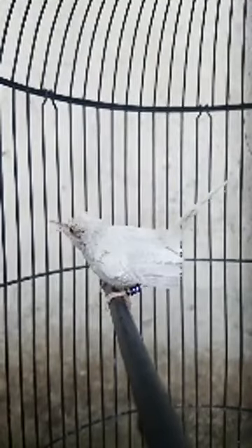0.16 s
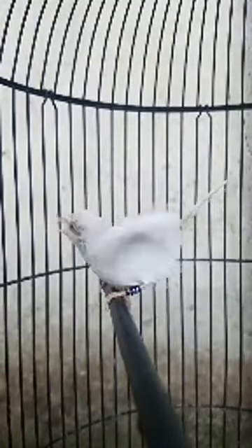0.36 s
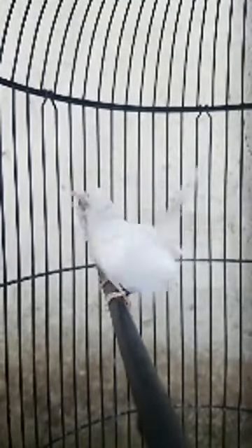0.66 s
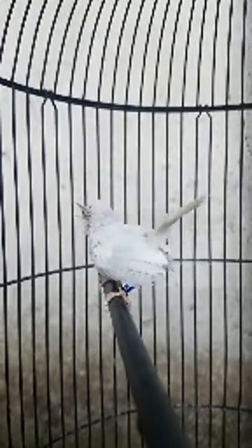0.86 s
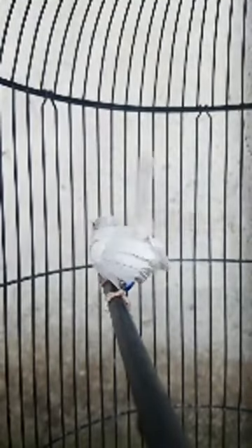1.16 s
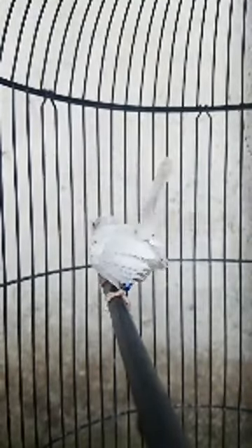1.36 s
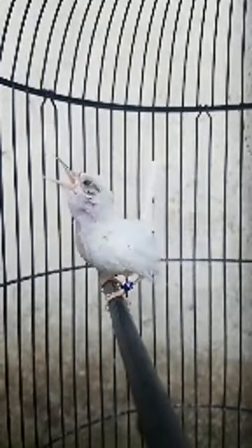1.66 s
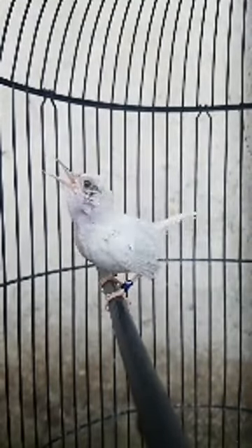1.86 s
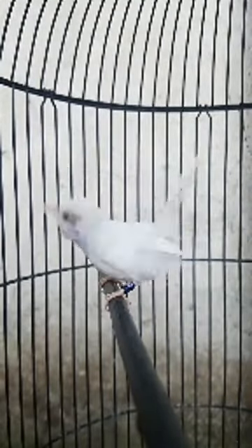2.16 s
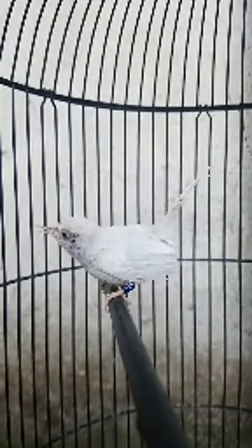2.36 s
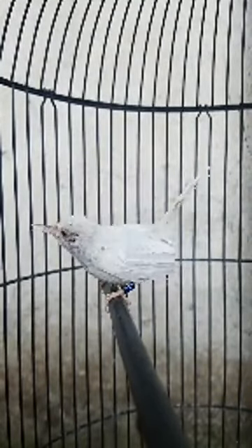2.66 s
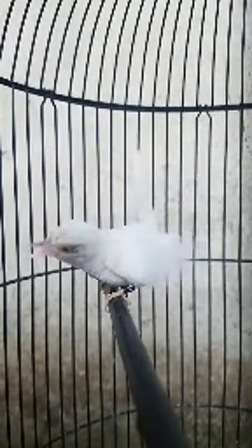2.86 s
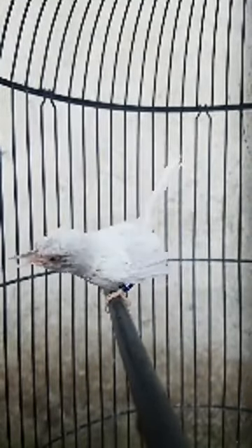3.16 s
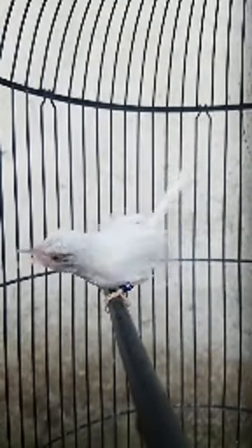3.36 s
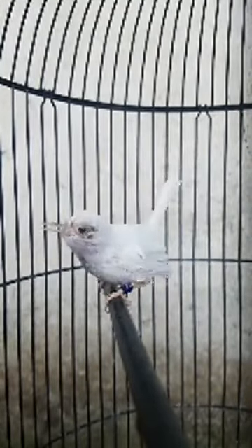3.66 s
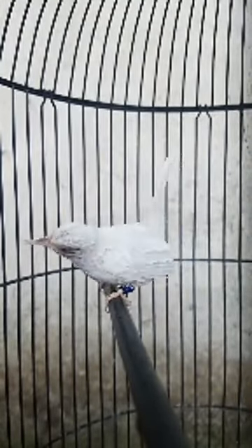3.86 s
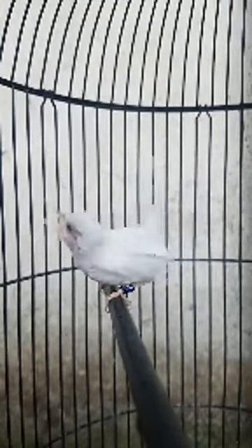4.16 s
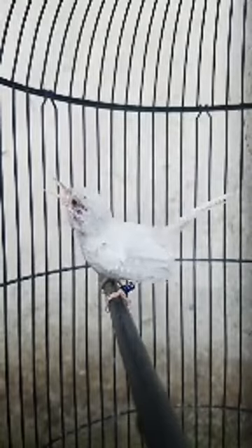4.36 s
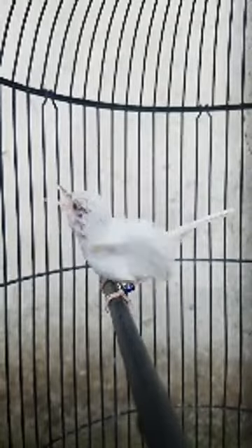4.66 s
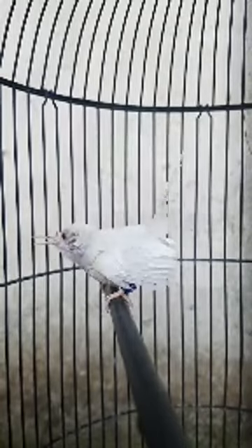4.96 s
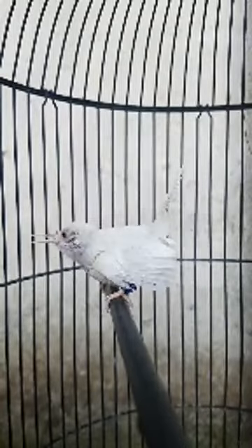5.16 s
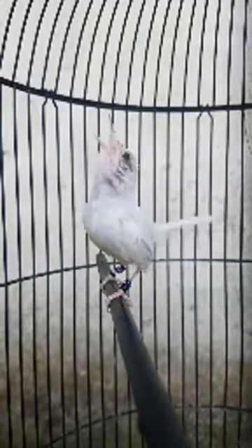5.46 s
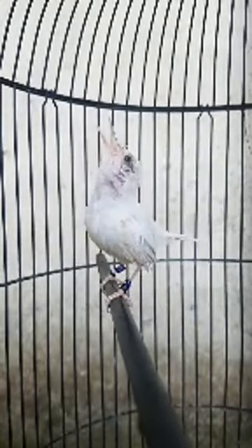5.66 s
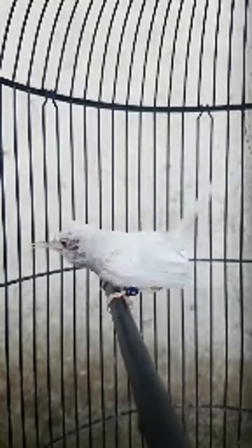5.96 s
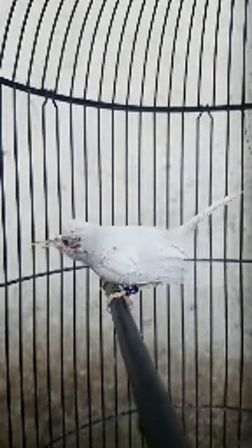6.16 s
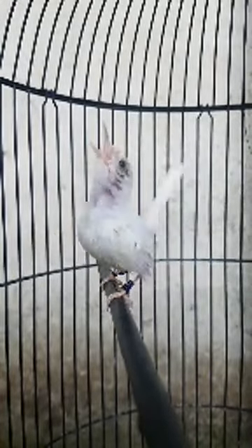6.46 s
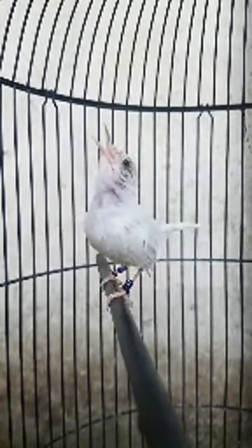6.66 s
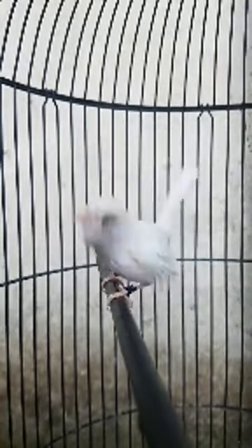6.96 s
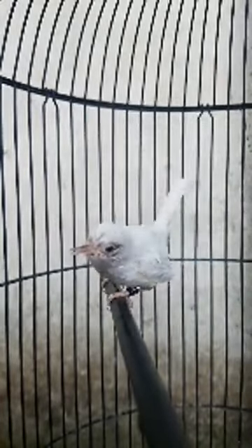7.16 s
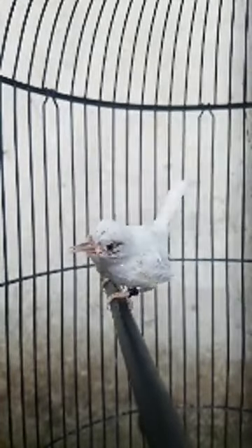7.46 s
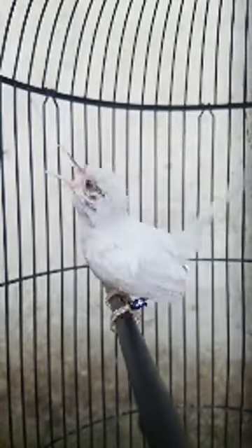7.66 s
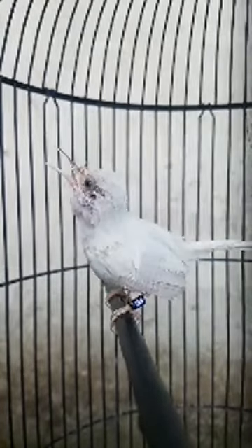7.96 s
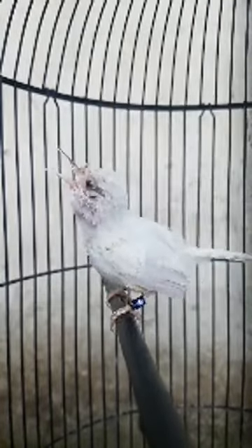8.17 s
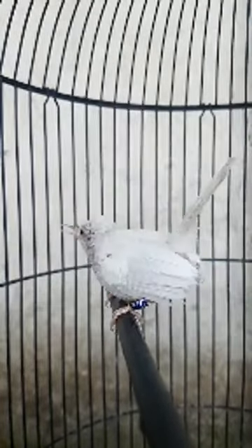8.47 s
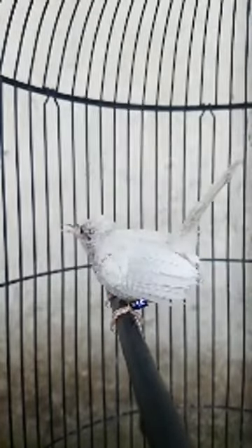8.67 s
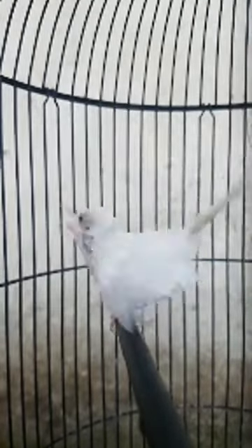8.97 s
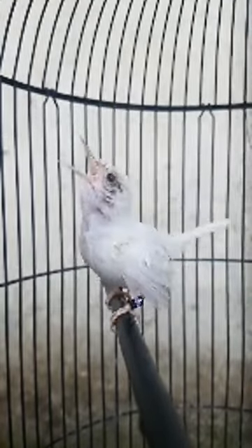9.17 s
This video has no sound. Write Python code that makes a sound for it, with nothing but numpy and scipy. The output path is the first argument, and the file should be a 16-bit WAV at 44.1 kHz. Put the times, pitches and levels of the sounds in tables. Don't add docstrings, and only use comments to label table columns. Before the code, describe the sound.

A small songbird close to the microphone and another across the room alternate loud, pure whistled phrases. Each starts with a tiny flick, drops into a steady high whistle, then ends in a fast swooping chirp. Dry bill rattles fall between songs. A low engine idles outside under faint street wash, with a brief tyre hiss early and a firm perch knock near the end.

```python
import sys
import numpy as np
from scipy import signal
from scipy.fft import rfft, irfft, next_fast_len
from scipy.io import wavfile
from scipy.ndimage import uniform_filter1d, minimum_filter1d, map_coordinates

SR = 44100
rng = np.random.default_rng(int(sys.argv[2]) if len(sys.argv) > 2 else 0)


def volts_from_decibels(level):
    exponent = np.asarray(level, float) / 20
    return 10 ** exponent


def generate_wav(sig):
    pcm = np.round(np.clip(np.atleast_2d(sig).T, -1, 1) * 32767).astype(np.int16)
    wavfile.write(sys.argv[1], SR, pcm)


N = 411012


def along(points, hz):
    f, v = np.transpose(points)
    return np.interp(np.log(hz + 1), np.log(f + 1), v)


def curve(rows):
    s, v = np.transpose(rows)
    return np.interp(np.arange(N) / SR, s, v)


def wobble(rate, size=N):
    knots = rng.standard_normal(int(size * rate / SR) + 4)
    coarse = np.arange(0, size + 16, 16)
    return np.interp(np.arange(size), coarse, map_coordinates(knots, [coarse * rate / SR]))


def filtered(x, response):
    m = next_fast_len(len(x) + 8192)
    return irfft(rfft(x, m) * response(np.fft.rfftfreq(m, 1 / SR)), m)[:len(x)]


def noise(spectrum):
    x = filtered(rng.standard_normal(N), lambda hz: volts_from_decibels(along(spectrum, hz)))
    return x / np.std(x)


def add(track, s, sound):
    part = track[round(s * SR):][:len(sound)]
    part += sound[:len(part)]


# f/Hz, decay by 60 dB t/s
ROOM_DECAY = [(500, 0.74), (3000, 0.32), (5000, 0.31), (10000, 0.022)]


def room(walls_db, tail_db):
    hz, t, z = signal.stft(rng.standard_normal(SR // 2), SR, nperseg=256)
    decay = volts_from_decibels(-60 * t / along(ROOM_DECAY, hz)[:, None])
    tail = signal.istft(z * decay, SR, nperseg=256)[1]
    response = volts_from_decibels(tail_db) * np.pad(tail, (300, 0)) / np.linalg.norm(tail)
    walls = rng.uniform(size=(6, 2))
    delays_s = .002 + .022 * walls[:, 0]
    response[(SR * delays_s).astype(int)] += volts_from_decibels(walls_db - 12.0 * walls[:, 1])
    response[0] = 1
    return response


WAVER_HZ, RIPPLE_HZ, WAVER_DB = 5, 7, .7


def note(rows, partials, rough_db, response):
    s, hz, db = np.transpose(rows)
    t = np.arange(s[0] - .002, s[-1] + 0.0052, 1 / SR)
    n = len(t)
    pitch = uniform_filter1d(np.interp(t, s, hz), size=151)
    pitch = pitch + WAVER_HZ * wobble(40, size=n) + RIPPLE_HZ * wobble(180, size=n)
    phase = 2 * np.pi * np.cumsum(pitch) / SR
    edge = np.clip(np.minimum((t - t[0]) / .004, (t[-1] - t) / .007), 0, 1)
    ends = np.sin(np.pi / 2 * edge) ** 2

    sweep = np.minimum(abs(np.gradient(pitch)) * SR / 40000, 1)
    breath = uniform_filter1d(uniform_filter1d(rng.standard_normal(SR), size=13), size=11)[:n] * 6
    air = volts_from_decibels(rough_db) * sweep * (t < t[0] + .1) * breath

    tone = np.zeros(n)
    for k, level in partials:
        flutter_db = .6 * wobble(70, size=n) if k == 1 else 4 * wobble(20, size=n)
        tone += volts_from_decibels(level + flutter_db) * np.sin(k * phase)
    level = uniform_filter1d(volts_from_decibels(np.interp(t, s, db)), size=89)
    sound = level * ends * tone * (1 + air) * volts_from_decibels(WAVER_DB * wobble(30, size=n))
    sound *= volts_from_decibels(3.3 * sweep * wobble(220, size=n))

    settled = np.clip((t - t[0] - .06) / .05, 0, 1)
    tail = (0, len(response) - 1)
    held = np.pad(settled * sound, tail)
    echoes = signal.fftconvolve(settled * sound, response) - held
    hidden = np.pad(.85 * settled * ends, tail)
    moving = signal.fftconvolve((1 - settled) * sound, response)
    return t[0], moving + held + (1 - hidden) * echoes


def sing(notes, walls_db, tail_db, rough_db):
    out = np.zeros(N)
    for rows, partials in notes:
        add(out, *note(rows, partials, rough_db, room(walls_db, tail_db)))
    return out


def placed(shape, s, db):
    return np.add(shape, [s, 0, db])


NEAR_SETTLE_S, SHARP_HZ, EASE_S = .08, 152, 0.088
PUSH_S, PUSH_RISE_S, PUSH_HZ = .045, 0.038, 51.6


def near_hold(s, end, rest_hz, first_db, last_db, push_db):
    push_at = end - PUSH_S
    t = np.append(np.linspace(s, push_at, num=12), [push_at + PUSH_RISE_S, end])
    push = np.clip((t - end + PUSH_S) / PUSH_RISE_S, 0, 1)
    hz = rest_hz + SHARP_HZ * np.exp((s - t) / EASE_S) + PUSH_HZ * push
    drift_db = np.interp(t, [s, push_at], [first_db, last_db])
    return np.c_[t, hz, drift_db + (push_db - last_db) * push]


# t/s after the note starts, f/Hz, level/dB
NEAR_FLICK = [(-0.004, 3182, -12), (0.0, 3391, 1), (0.005, 3543, -1.5), (0.01, 3655, 5),
              (0.015, 3555, -19.5)]
NEAR_GLIDE = [(0.0, 5050, -13), (0.005, 4620, -1.5), (0.011, 4258, 6.5), (0.02, 3919, 0.5),
              (0.035, 3776, 0.5), (0.055, 3660, -1.5)]
NEAR_SLUR = [(-0.001, 3260, 0), (0.004, 3068, 5), (0.01, 2753, 3), (0.016, 2500, -4), (0.022, 2444, -1),
             (0.027, 2385, -28.5)]
NEAR_ARCH = [(0.0, 1564, -23.5), (0.005, 1972, -16), (0.012, 2752, -1.5), (0.018, 3281, 0),
             (0.024, 3468, 4), (0.03, 3299, 2.5), (0.036, 2901, -9), (0.042, 2392, -10),
             (0.049, 1570, -25.5)]
# flick t/s, flick level/dB, glide level/dB
NEAR_OPENINGS = [(0.685, -7.5, -13.5), (1.769, -5.5, -15), (3.035, -6, -16.5), (4.322, -7.5, -14.0),
                 (5.503, -12.5, -17), (6.571, -6, -16.5), (7.843, -7, -15.5), (9.227, -9.5, -13.5)]
# end t/s, resting f/Hz, settled level/dB, level/dB before the push, push level/dB
NEAR_WHISTLES = [(1.087, 3412, -15, -16.5, -9), (2.161, 3407, -15, -15, -9.5),
                 (3.4, 3426, -12.5, -12.5, -5.5), (4.695, 3407, -17.5, -11, -8),
                 (5.907, 3394, -19.5, -13.5, -10.5), (6.952, 3396, -18, -13.5, -9.5),
                 (8.222, 3398, -14.5, -13.5, -7), (9.6, 3386, -20.5, -14, -12)]
# slur t/s, slur level/dB, arch level/dB
NEAR_FLOURISHES = [(1.146, -13.5, -10), (2.22, -14.5, -9.5), (3.456, -11.5, -7), (4.761, -14.5, -9),
                   (5.967, -12.5, -8.5), (7.008, -13.5, -6.5), (8.281, -13, -9.5)]
# multiple of pitch, level/dB
NEAR_PARTIALS = [(.5, -49), (1, 0), (1.5, -65), (2, -63.5), (3, -72.5)]
# multiple of pitch, level/dB
FLICK_PARTIALS = [(.5, -46), (1, 0), (1.4, -40), (2, -50)]
SLUR_PARTIALS = [(1, 0), (1.28, -21), (2, -49)]
ARCH_PARTIALS = [(1, 0.5), (1.5, -44.5), (2, -53)]
NEAR_GLIDE_AFTER_S, ARCH_AFTER_S = .0245, .0405


def near_bird():
    notes = []
    for (s, flick_db, glide_db), hold in zip(NEAR_OPENINGS, NEAR_WHISTLES):
        glide = s + NEAR_GLIDE_AFTER_S
        held = near_hold(glide + NEAR_SETTLE_S, *hold)
        whistle = np.vstack([placed(NEAR_GLIDE, glide, glide_db), held])
        notes.append((placed(NEAR_FLICK, s, flick_db), FLICK_PARTIALS))
        notes.append((whistle, NEAR_PARTIALS))
    for s, slur_db, arch_db in NEAR_FLOURISHES:
        notes.append((placed(NEAR_SLUR, s, slur_db), SLUR_PARTIALS))
        notes.append((placed(NEAR_ARCH, s + ARCH_AFTER_S, arch_db), ARCH_PARTIALS))
    return sing(notes, walls_db=-19, tail_db=-23, rough_db=-33.0)


FAR_SETTLE_S, SAG_HZ_PER_S, DROOP_HZ, DROOP_S, SWELL_STEEP = .07, 420, 25.2, 0.043, 2.5


def far_hold(s, end, last_hz, first_db, last_db, half_s):
    t = np.linspace(s, end, num=14)
    swell = 1 - 1 / (1 + ((t - s) / half_s) ** SWELL_STEEP)
    hz = last_hz + SAG_HZ_PER_S * (end - t) + DROOP_HZ * (1 - np.exp((t - end) / DROOP_S))
    return np.c_[t, hz, first_db + (last_db - first_db) * swell / swell[-1]]


# t/s after the note starts, f/Hz, level/dB
FAR_FLICK = [(-0.002, 3420, 5.5), (0.002, 3640, 0), (0.006, 3600, 6.5), (0.011, 4100, -1.5),
             (0.015, 3910, -12.5)]
FAR_GLIDE = [(0.0, 5070, -6), (0.005, 4540, 2), (0.011, 4280, 0.5), (0.018, 3960, 2.5), (0.03, 3600, -3.5),
             (0.045, 3430, 0.5)]
FAR_SWOOP = [(-0.002, 3140, -22.5), (0.003, 2972, 6), (0.011, 2413, -3.5), (0.022, 1596, -18.5),
             (0.032, 2348, -5), (0.042, 3169, 4), (0.053, 3290, 4), (0.064, 3006, 1.5),
             (0.082, 2244, -16.5)]
# flick t/s, flick level/dB, glide level/dB
FAR_OPENINGS = [(.027, -21, -14.5), (1.895, -18, -17.5), (3.511, -21.5, -17), (5.069, -20, -15.5),
                (6.929, -16, -16), (8.549, -19, -15)]
# end t/s, last f/Hz, first level/dB, last level/dB, time to half the swell t/s
FAR_WHISTLES = [(0.333, 3251, -18, -6.5, 0.049), (2.194, 3275, -12.5, -7, .1),
                (3.819, 3233, -18, -6.5, 0.026), (5.369, 3258, -12.5, -5, 0.039),
                (7.235, 3256, -16.5, -7.5, 0.47), (8.856, 3242, -13.5, -6.5, 0.031)]
# t/s after, change of f/Hz, change of level/dB
FAR_HOOK = [(.003, -70, -1), (.007, -260, -9)]
# swoop t/s, level/dB
FAR_SWOOPS = [(0.41, -8), (2.268, -8), (3.895, -8), (5.447, -8.5), (7.311, -7), (8.931, -7.5)]
# multiple of pitch, level/dB
FAR_PARTIALS = [(.5, -58), (1, 0), (1.5, -52), (2, -54.5), (3, -72.5)]
SWOOP_PARTIALS = [(1, 0), (1.5, -46), (2, -48), (3, -67)]
FAR_GLIDE_AFTER_S = .0275


def far_bird():
    notes = []
    for (s, flick_db, glide_db), row, swoop in zip(FAR_OPENINGS, FAR_WHISTLES, FAR_SWOOPS):
        glide = s + FAR_GLIDE_AFTER_S
        hold = far_hold(glide + FAR_SETTLE_S, *row)
        whistle = np.vstack([placed(FAR_GLIDE, glide, glide_db), hold, np.add(FAR_HOOK, hold[-1])])
        notes.append((placed(FAR_FLICK, s, flick_db), FLICK_PARTIALS))
        notes.append((whistle, FAR_PARTIALS))
        notes.append((placed(FAR_SWOOP, *swoop), SWOOP_PARTIALS))
    return sing(notes, walls_db=-16, tail_db=-21.0, rough_db=-32.5)


# first snap t/s, last snap t/s, loudest level/dB, place of the loudest snap
RATTLES = [(0.5652, 0.5938, -29, 1.3), (1.715, 1.7674, -27, 1.3), (3.3076, 3.36, -27, 1),
           (4.1935, 4.2393, -27, 1.4), (4.868, 4.9223, -26, 0.97), (6.7337, 6.792, -26, 2),
           (7.7248, 7.7573, -27, .4), (8.3796, 8.408, -27, 0.16), (9.087, 9.153, -26.5, 1.6)]
SNAP_COUNTS = [3, 5, 5, 4, 5, 5, 3, 3, 5]
# f/Hz, level/dB
BILL = [(500, -36), (900, -5.5), (1600, 0.5), (3000, 0), (4300, 7.5), (6000, -3.5), (7200, -15),
        (8200, -23), (11000, -14), (16000, -16)]
SNAP_RISE_DB, SNAP_FADE_DB, SNAP_SCATTER_DB, SNAP_SPACING_POWER = 4, 3.5, 1.6, 0.94


def bills():
    out, t = np.zeros(N), np.arange(300) / SR
    for (first, last, top_db, place), count in zip(RATTLES, SNAP_COUNTS):
        k = np.arange(count)
        response = room(walls_db=-12, tail_db=-14)[:SR // 3]
        times = first + (last - first) * (k / (count - 1)) ** SNAP_SPACING_POWER
        levels = top_db - np.maximum(SNAP_RISE_DB * (place - k), SNAP_FADE_DB * (k - place))
        for s, db in zip(times, levels):
            crack = volts_from_decibels(-60 * t / 0.014) * rng.standard_normal(len(t))
            scatter_db = SNAP_SCATTER_DB * rng.standard_normal()
            crack *= volts_from_decibels(db + 20.0 + scatter_db) / np.linalg.norm(crack)
            add(out, s, signal.fftconvolve(crack, response))
    return filtered(out, lambda hz: volts_from_decibels(along(BILL, hz)))


# t/s, peak level/dB
KNOCKS = [
    (2.855, -59),
    (6.481, -39),
    (9.2, -21.5),
    (9.206, -34),
]
# f/Hz, width f/Hz, level/dB
PERCH_MODES = [(480, 130, -4.5), (930, 32, 5), (1170, 71, -2), (2300, 1200, -6.5)]


def perch():
    blows = np.zeros(N)
    for s, db in KNOCKS:
        add(blows, s, volts_from_decibels(db + 13.5) * np.hanning(14))

    def wood(f):
        total = 0
        for k, (centre, width, db) in enumerate(PERCH_MODES):
            damping = 1j * f * width
            total = total + (-1) ** k * volts_from_decibels(db) * damping / (centre * centre - f * f + damping)
        return total

    return signal.fftconvolve(filtered(blows, wood), room(walls_db=-3.5, tail_db=-13.5))[:N]


# start t/s, end t/s, cycle f/Hz
LOADS = [(0.197, .45, 14.3), (1.162, 1.629, 14.15), (2.723, 3.499, 14.05), (3.753, 4.121, 14.2),
         (4.214, 5.245, 14.2), (5.448, 5.943, 14.2), (6.701, 7.9, 14.47)]
# multiple of the firing cycle, level/dB
ORDERS = [(1, -33), (2, -27), (3, -17.5), (4, 0), (5, -5.5), (6, -3), (7, -4), (8, -3), (9, 2), (10, -11),
          (11, -20), (12, -20), (13, -5), (14, -9.5), (15, -15.5), (16, -18), (17, -13.5), (18, -7),
          (19, -14), (20, -26.5)]
LOAD_DB_PER_HZ = {9: 7, 13: 22.5, 14: -10}
# f/Hz, level/dB
WHINE = [(972, -69.5)]
# t/s, level/dB
WHINE_FADES = [(0, -0.5), (4.6, 1), (5.2, -4.5), (9.32, -4.5)]
# f/Hz, level/dB per Hz
RUMBLE = [(15, -58.5), (25, -28.5), (43, -8.5), (119, -6.5), (257, -15.5), (408, -23.5), (501, -25),
          (659, -28.5), (961, -32.5), (1500, -41), (1950, -65), (3300, -120)]
IDLE_HZ, IDLE_DB, SAG_S = 14.55, -44, .06
RUMBLE_SWAY_DB = .8


def engine():
    t = np.arange(N) / SR
    sag = np.zeros(N)
    for start, end, hz in LOADS:
        sag += (IDLE_HZ - hz) * np.clip(np.minimum(t - start, end - t) / SAG_S + .5, 0, 1)
    cycle_hz = (IDLE_HZ - sag) * (1 + .002 * wobble(3.2))
    phase = 2 * np.pi * np.cumsum(cycle_hz) / SR
    orders = np.zeros(N)
    for k, db in ORDERS:
        load_db = LOAD_DB_PER_HZ.get(k, 0) * (sag - .2)
        level = volts_from_decibels(db + load_db + 1.5 * wobble(3))
        orders += level * np.sin(k * phase + rng.uniform(0, 2 * np.pi))
    throb = volts_from_decibels(IDLE_DB) * orders / np.std(orders)

    whine = np.zeros(N)
    for hz, db in WHINE:
        level = volts_from_decibels(db + curve(WHINE_FADES) + 4 * wobble(3))
        whine += level * np.sin(2 * np.pi * np.cumsum(hz + 4 * wobble(3)) / SR)
    rumble = volts_from_decibels(-48.0 + RUMBLE_SWAY_DB * wobble(2.8)) * noise(RUMBLE)
    return throb + whine + rumble


# t/s, length t/s, start f/Hz, end f/Hz, level/dB
COOS = [(0.899, 0.39, 818, 804, -65), (2.096, 0.15, 795, 762, -63.5), (3.507, 0.21, 820, 776, -74),
        (4.381, 0.32, 685, 665, -64), (4.722, 0.14, 765, 762, -65.5), (4.974, 0.036, 765, 780, -58),
        (5.017, 0.052, 2185, 2050, -62.5), (5.72, 0.14, 700, 706, -68), (8.864, 0.11, 560, 570, -63.5),
        (7.699, 0.36, 580, 640, -66.5), (9.248, 0.021, 2160, 2100, -49.5)]


def dove():
    out = np.zeros(N)
    for s, length, start_hz, end_hz, db in COOS:
        t = np.arange(0, length, 1 / SR)
        swell = np.sin(np.pi * t / length) ** .6 * volts_from_decibels(3 * wobble(18, size=len(t)))
        pitch = start_hz + (end_hz - start_hz) * t / length + 7 * wobble(25, size=len(t))
        add(out, s, volts_from_decibels(db + 6.5) * swell * np.sin(2 * np.pi * np.cumsum(pitch) / SR))
    return out


# t/s, level/dB
STREET_LEVEL = [(0, -60.5), (1.1, -61.5), (1.9, -57.5), (2.7, -63.5), (4.1, -62), (5, -59.5), (5.7, -60.5),
                (6.3, -62), (7.6, -62.5), (8.5, -60.5), (9.32, -54.5)]
# f/Hz, level/dB per Hz
STREET = [(600, -31.5), (1000, -8), (1300, -2.5), (1600, -8.5), (2800, -8.5), (4000, -15.5), (5000, -22.5),
          (6500, -26), (8500, -37.5), (11000, -58)]
# t/s, level/dB
SWISH = [
    (1.05, -80.5),
    (1.2, -54.5),
    (1.45, -56.5),
    (1.7, -59),
    (1.95, -66.5),
    (2.4, -98.5),
]
# f/Hz, level/dB per Hz
TYRES = [(800, -36.5), (1500, -8), (3000, 5.5), (4500, 0), (5500, -15), (7000, -30.5), (9000, -67.5)]


def street():
    wash = volts_from_decibels(curve(STREET_LEVEL) + 1.6 * wobble(15)) * noise(STREET)
    return wash + volts_from_decibels(curve(SWISH)) * noise(TYRES)


def scene():
    return (near_bird() + far_bird() + bills() + perch() + engine() + dove() + street())[None]


def top_cut(x):
    return signal.sosfilt(signal.butter(12, 16085, fs=SR, output="sos"), x)


# f/Hz, level/dB
CAPSULE = [(20, 1.5), (7000, -0.5), (8200, -13.5), (16000, -11.5)]
# f/Hz, width f/Hz, level/dB
RASP = [(10000, 900, -77.5), (10600, 700, -75), (11500, 1200, -84), (13850, 900, -74), (14700, 800, -77),
        (15400, 600, -76)]
# f/Hz, level/dB per Hz
AIR = [(6000, -40.5), (8500, -8), (11000, -1.5), (13500, 0.5), (15700, 1), (16200, -61.5)]
AIR_DB, DUCK_AT_DB = -79, -40


def record(dry):
    power = dry[0] ** 2
    loudness = abs(uniform_filter1d(power, size=900)) ** 0.25
    slow_rms = np.sqrt(abs(uniform_filter1d(power, size=3000)))
    hiss = volts_from_decibels(AIR_DB) * noise(AIR) / (1 + slow_rms / volts_from_decibels(DUCK_AT_DB))
    rasp = np.zeros(N)
    for hz, width, db in RASP:
        low, high = hz - width / 2, hz + width / 2
        band = [(low - 150, -40), (low, 0), (high, 0), (high + 150, -40)]
        rasp += volts_from_decibels(db + 6.3 * wobble(9) + 3.5 * wobble(30)) * noise(band)
    coloured = filtered(dry[0], lambda hz: volts_from_decibels(along(CAPSULE, hz)))
    x = (coloured + loudness * rasp + hiss)[None]
    need = np.minimum(1, .86 / np.maximum(abs(x), 1e-9))
    gain = uniform_filter1d(minimum_filter1d(need, size=441), size=221)
    return top_cut(x * gain)


dry = scene()
out = record(dry)
generate_wav(out)
```